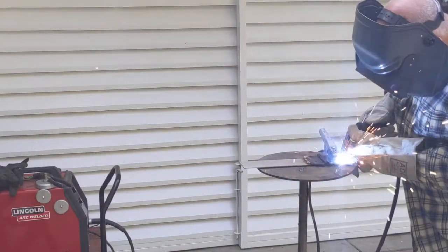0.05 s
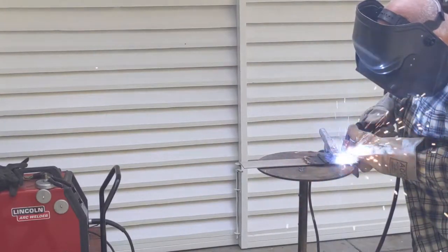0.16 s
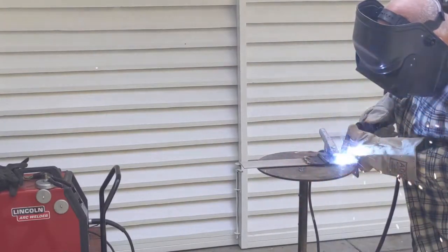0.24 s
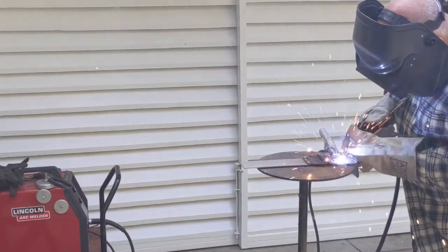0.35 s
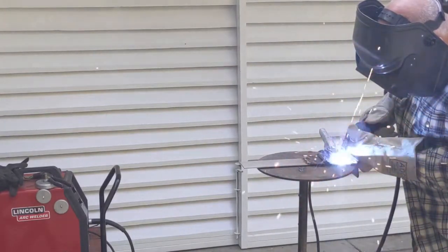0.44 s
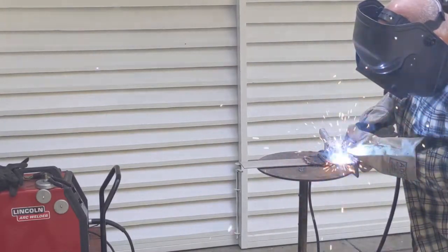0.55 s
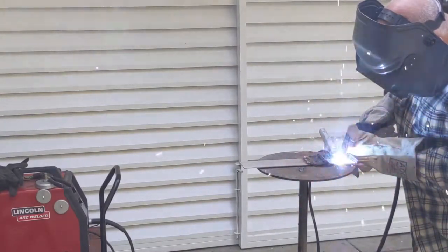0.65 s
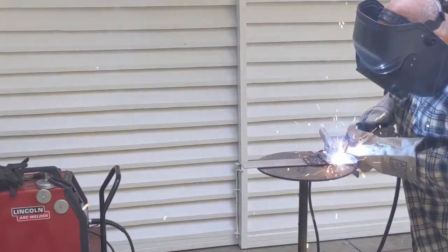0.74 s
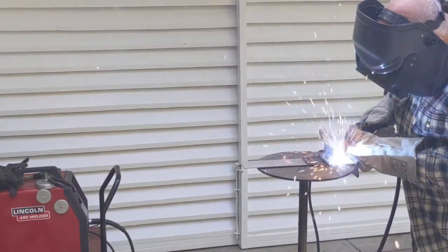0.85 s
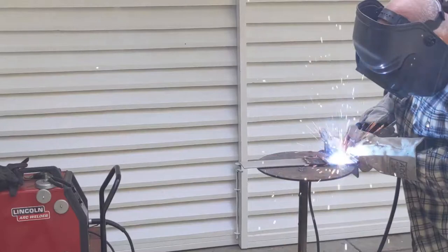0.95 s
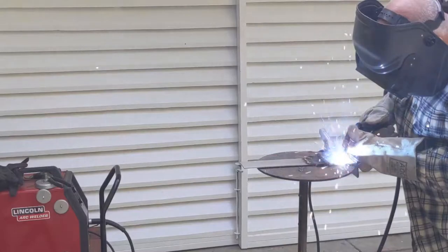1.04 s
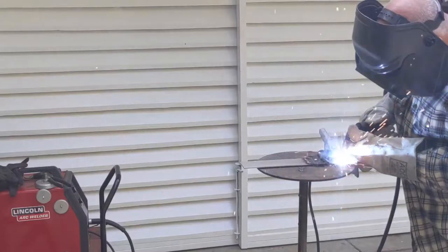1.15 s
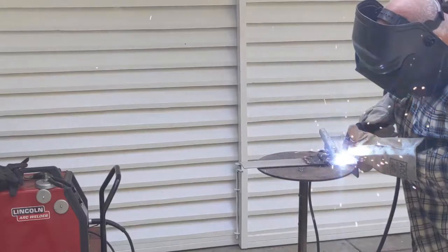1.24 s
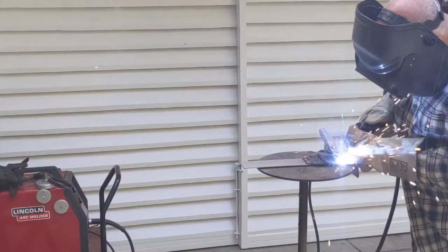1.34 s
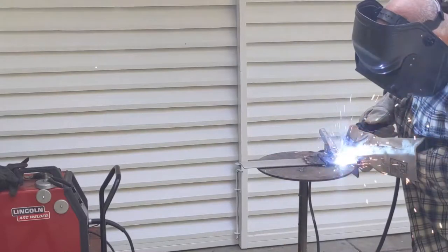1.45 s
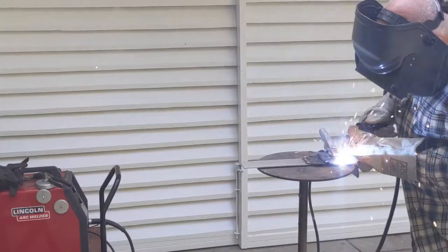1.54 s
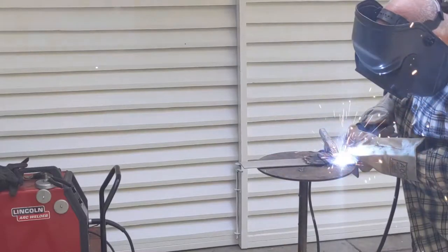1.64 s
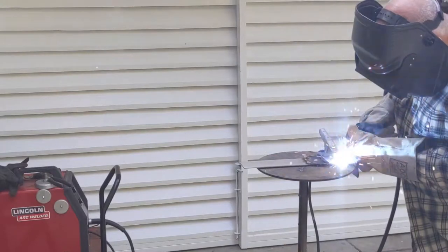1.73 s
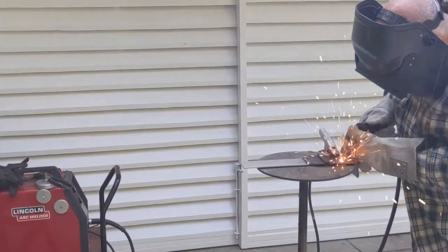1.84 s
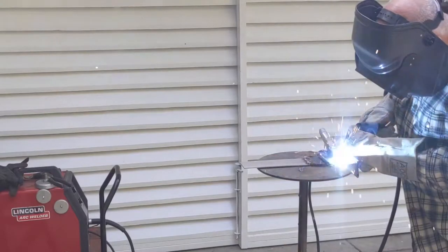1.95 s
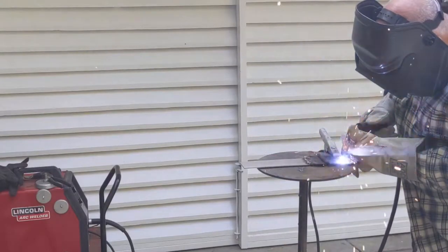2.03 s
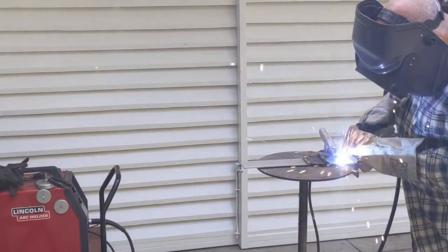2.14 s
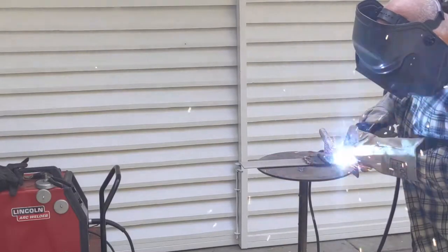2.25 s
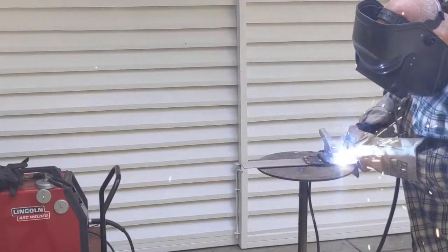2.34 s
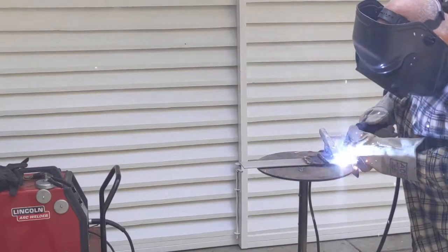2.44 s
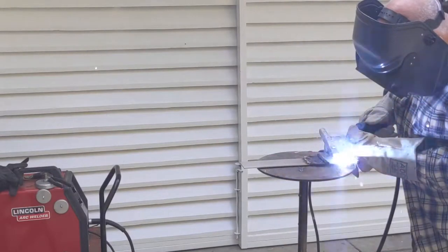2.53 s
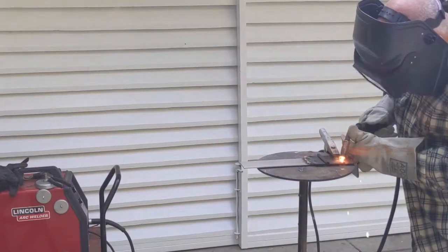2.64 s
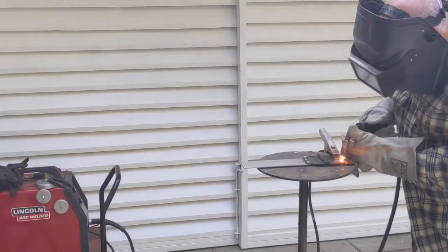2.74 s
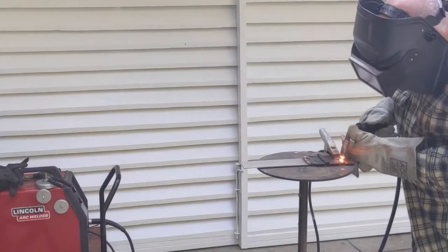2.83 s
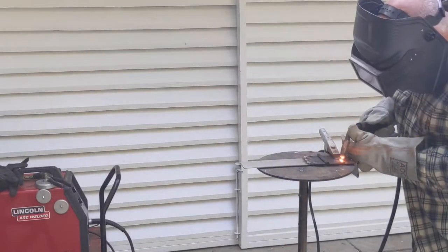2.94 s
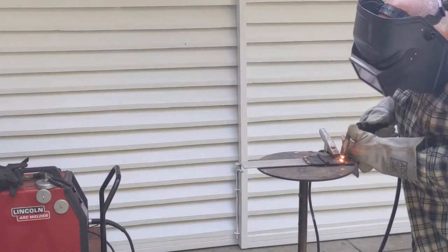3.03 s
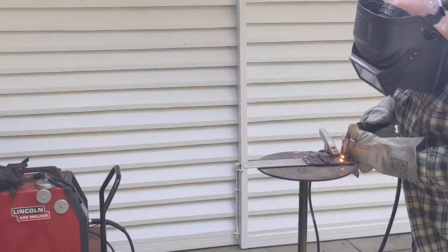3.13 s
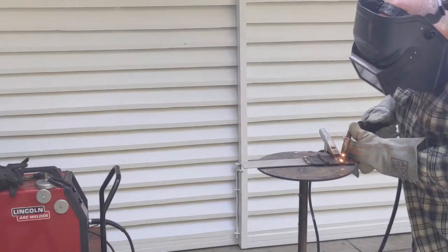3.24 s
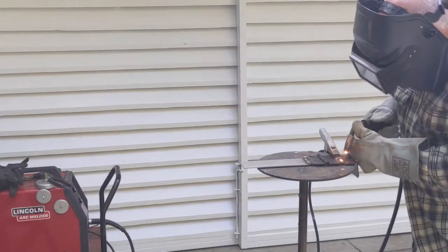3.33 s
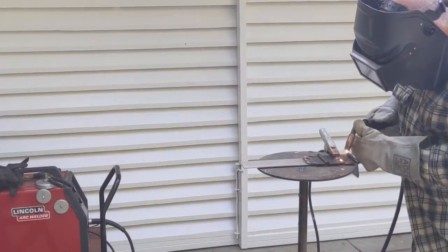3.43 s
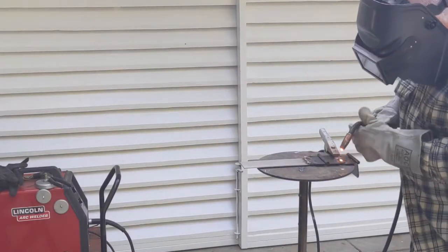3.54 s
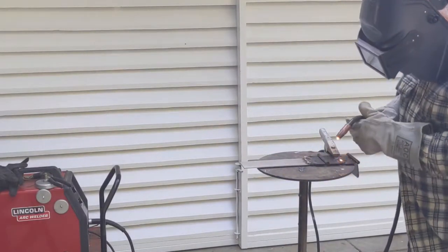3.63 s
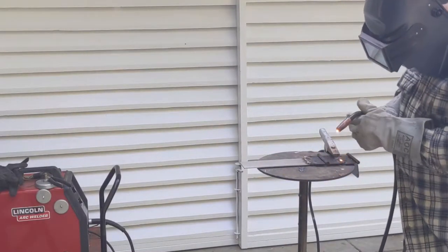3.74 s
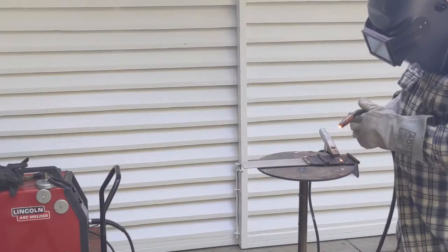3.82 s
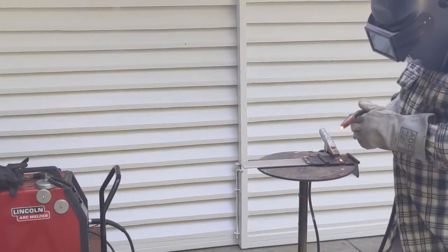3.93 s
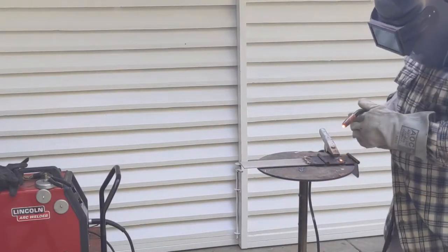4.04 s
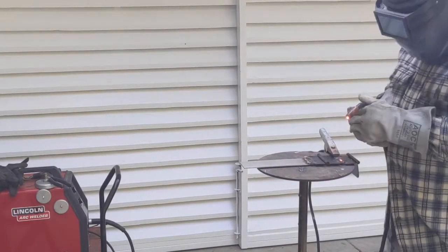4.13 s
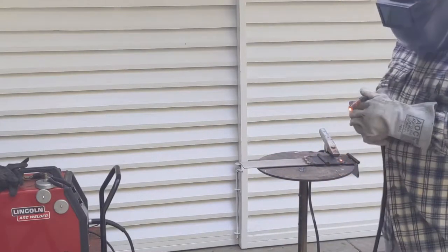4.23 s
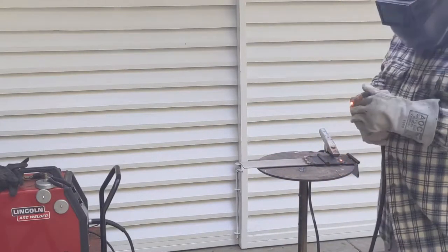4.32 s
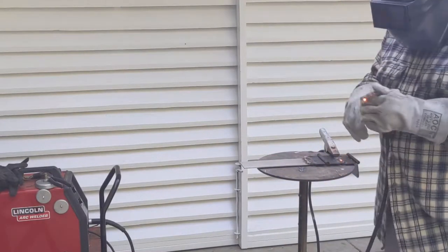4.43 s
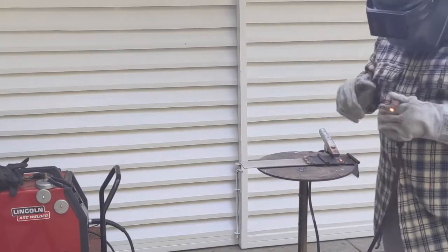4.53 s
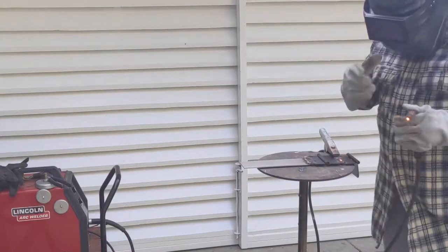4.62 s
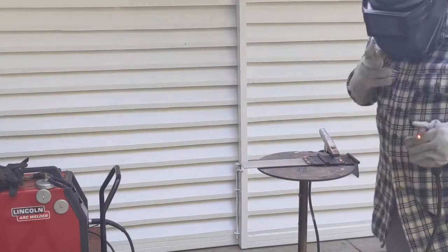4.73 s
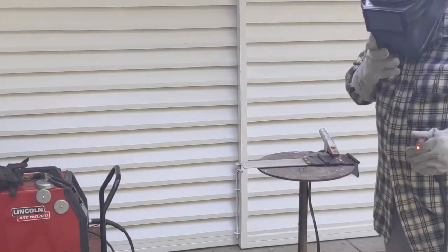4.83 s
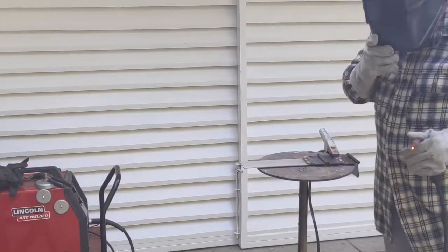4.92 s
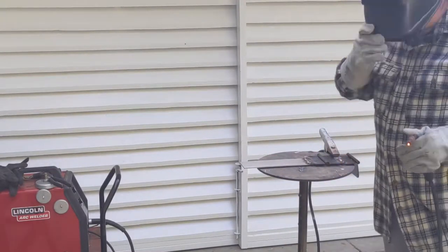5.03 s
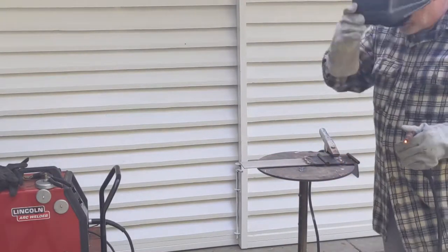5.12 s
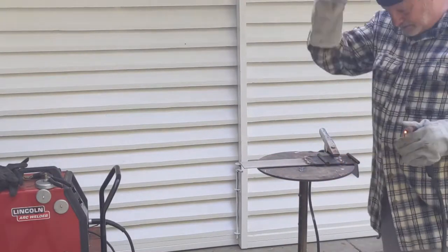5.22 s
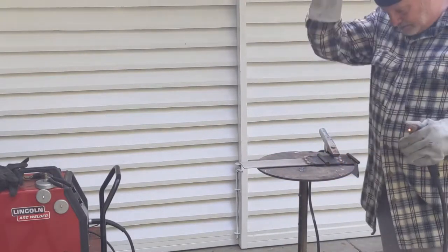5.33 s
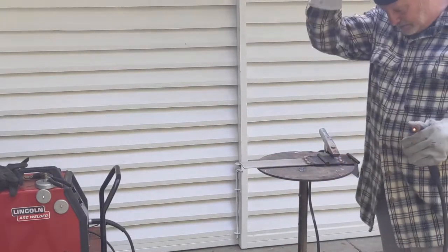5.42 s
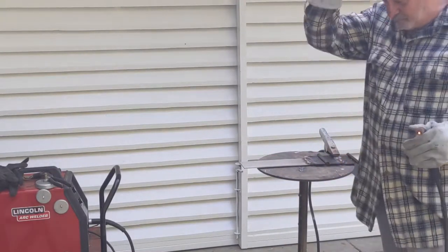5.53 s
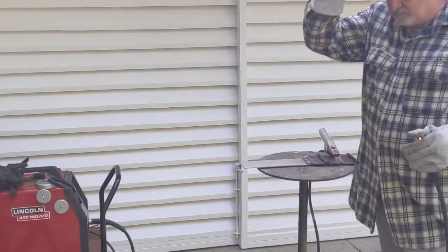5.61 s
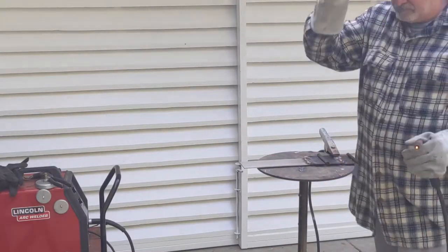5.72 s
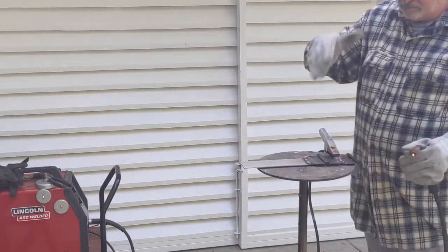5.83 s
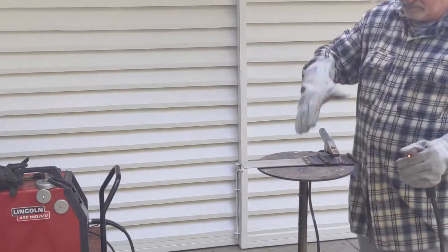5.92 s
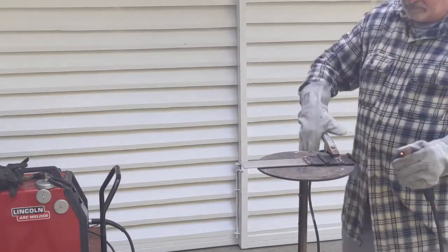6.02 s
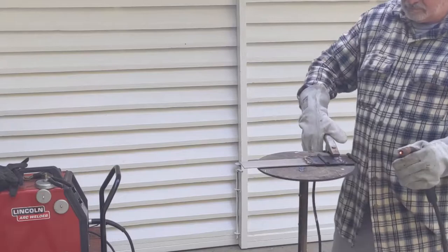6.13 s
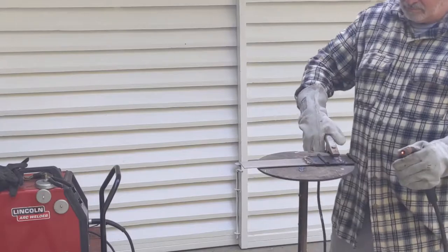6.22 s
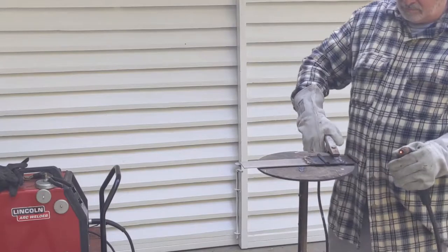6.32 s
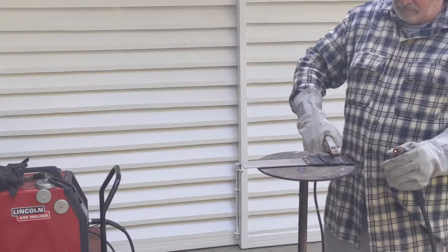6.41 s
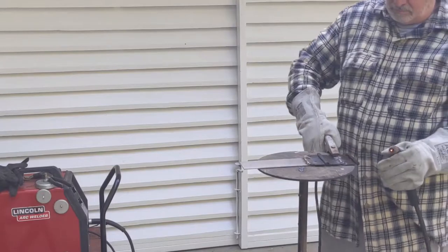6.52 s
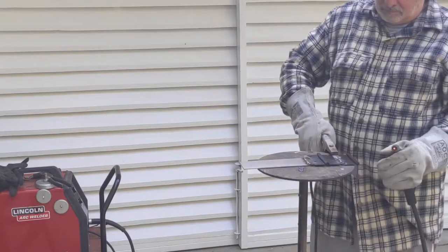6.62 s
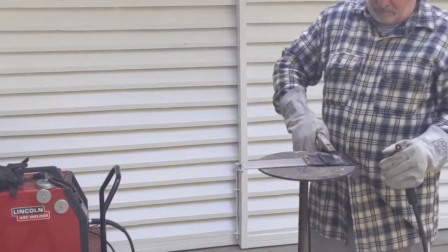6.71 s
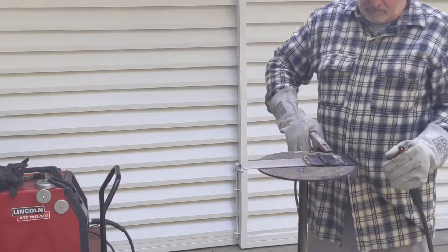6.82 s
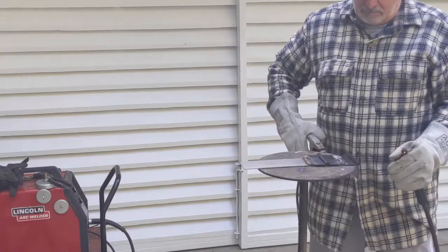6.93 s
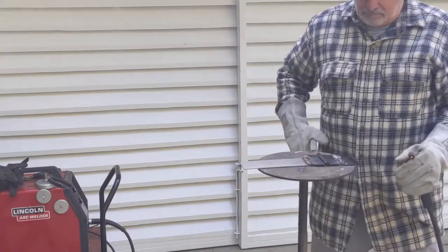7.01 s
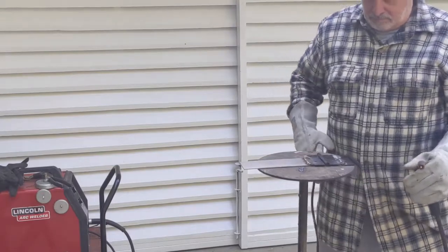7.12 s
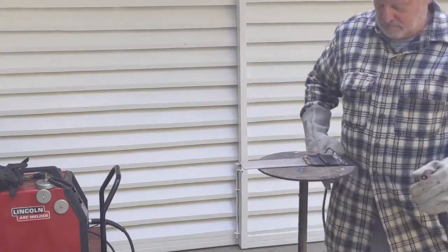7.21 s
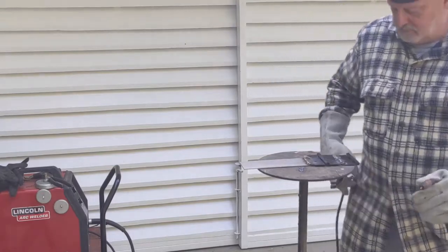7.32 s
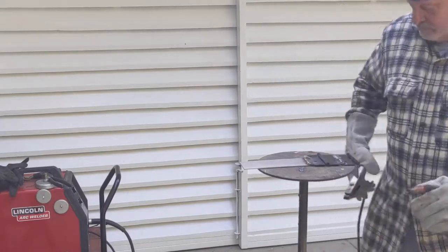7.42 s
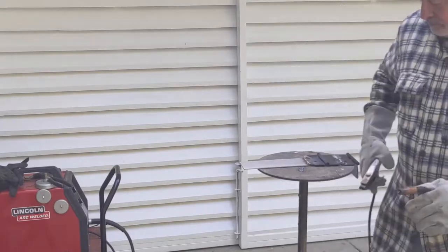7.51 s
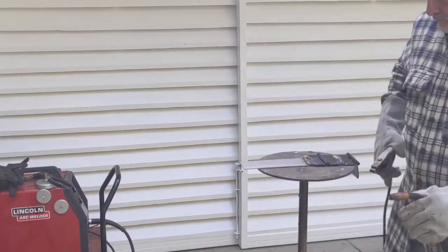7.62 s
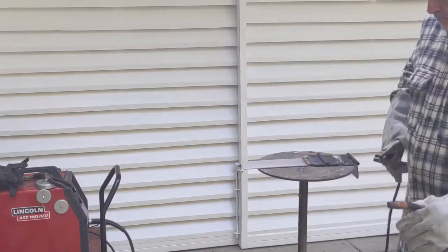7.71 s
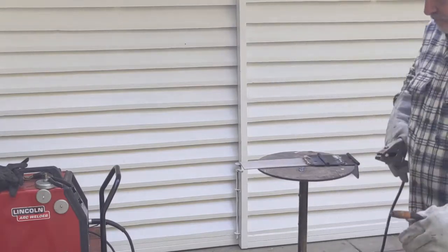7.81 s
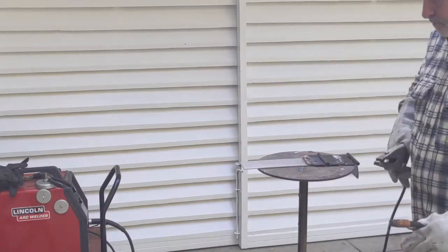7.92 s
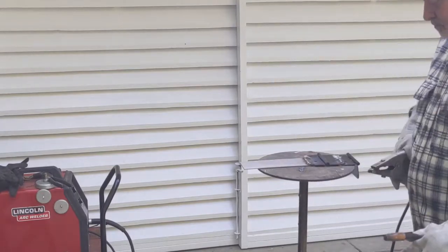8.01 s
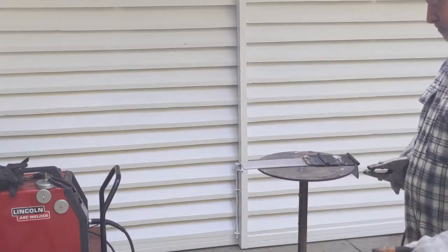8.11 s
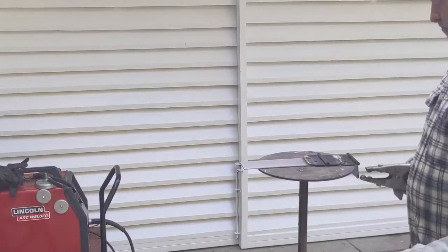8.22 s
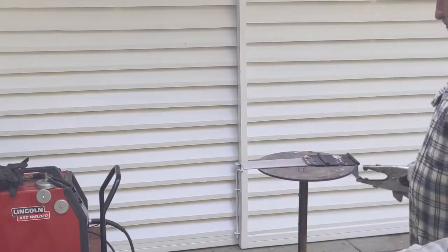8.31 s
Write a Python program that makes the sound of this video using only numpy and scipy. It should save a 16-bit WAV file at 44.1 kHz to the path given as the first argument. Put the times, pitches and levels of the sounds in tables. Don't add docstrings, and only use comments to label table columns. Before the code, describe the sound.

In a yard before a metal door, a welder a few steps from a stereo microphone makes rapid, buzzing arc snaps in stuttering runs, with harder cracks, low booming pops and bright gas hiss. The arc stops abruptly and the gas bleeds off. The machine's fan hums steadily while a helmet knocks, gloves rustle, a clamp clanks on steel and scrapes away. A thin bird calls far off; an insect whines at the end.

```python
import sys
import numpy as np
from scipy import signal
from scipy.fft import rfft, irfft
from scipy.io import wavfile
from scipy.ndimage import uniform_filter1d

SR = 44100
rng = np.random.default_rng(int(sys.argv[2]) if len(sys.argv) > 2 else 0)


def rack_gain(trim_db):
    fader = np.asarray(trim_db, float)
    return 10 ** (fader / 20)


def unload_audio(sound):
    columns = np.transpose(np.atleast_2d(sound))
    steps = np.round(np.clip(columns, -1, 1) * 32767)
    wavfile.write(sys.argv[1], SR, steps.astype(np.int16))


N = 368676


def evened(x):
    return x / np.sqrt(np.mean(x ** 2) + 1e-20)


def curve(rows, column=1):
    return np.interp(np.arange(N) / SR, *np.transpose(rows)[[0, column]])


def read(points, hz):
    f, value = np.transpose(points)
    return np.interp(np.log(hz + 1), np.log(f + 1), value)


def add(mix, s, sound):
    part = mix[..., round(s * SR):][..., :sound.shape[-1]]
    part += sound[..., :part.shape[-1]]


def causal(points, size=2048):
    log_gain = np.log(rack_gain(read(points, abs(np.fft.fftfreq(size, 1 / SR)))))
    spectrum = np.exp(log_gain - 1j * signal.hilbert(log_gain).imag)
    response = np.fft.ifft(spectrum).real[:size // 2]
    return response / np.linalg.norm(response)


def resonate(x, hz, width):
    turn = np.exp(2j * np.pi * np.cumsum(hz * np.ones(len(x))) / SR)
    r = np.exp(-np.pi * width / SR)
    return 2 * (turn * signal.lfilter([1 - r], [1, -r], x / turn)).real


def band(x, lo_hz, hi_hz):
    sos = signal.butter(2, [lo_hz, min(hi_hz, .49 * SR)], "bandpass", fs=SR, output="sos")
    return evened(signal.sosfilt(sos, x))


def pair(x, lag=0, pan_db=0, loose=.5):
    scatter = np.diff(rng.standard_normal((2, 401))) * rack_gain(-60 * np.arange(400) / SR / 0.021) * loose / 6
    scatter[[0, 1], [max(-lag, 0), max(lag, 0)]] += 1
    return signal.oaconvolve(x[None], scatter, axes=1)[:, :N] * rack_gain([[pan_db / 2], [-pan_db / 2]])


# (first time [s], last time [s], rate [snaps/s])
RUNS = [(.0057, .0905, 106), (.1379, .2193, 111), (.2269, .2571, 132), (.2657, .3277, 113),
        (.4328, .4411, 120), (.4561, .5034, 106), (.6353, .6432, 126), (.6573, .6857, 106),
        (.8397, .8843, 135), (.8945, .934, 152), (.9415, .9924, 137), (1.0006, 1.091, 121.5),
        (1.0998, 1.1323, 123), (1.1412, 1.1777, 110), (1.1854, 1.2294, 114), (1.2682, 1.352, 119),
        (1.3627, 1.3722, 105), (1.3874, 1.4013, 72), (1.4412, 1.4861, 134), (1.4961, 1.5166, 146),
        (1.5251, 1.5931, 118), (1.6094, 1.6362, 75), (1.6549, 1.701, 130), (1.7095, 1.7914, 110),
        (1.8145, 1.8507, 110), (1.861, 1.9086, 105), (1.9159, 1.9432, 146), (2.0843, 2.1351, 118),
        (2.2386, 2.3353, 124), (2.4339, 2.4867, 114)]
RUN_DB = [-7.5, -8.5, -6.5, -9, -10.5, -9.5, -10.5, -9, -7.5, -9, -8.5, -9.5, -5.5, -9.5, -10.5, -7.5, -9.5,
          -9.5, -11, -9, -11, -6, -10, -8, -7.5, -7.5, -10.5, -11, -9.5, -8.5]
# (time [s], level [dB])
STRIKES = [(0.1045, -9), (0.121, -6.5), (0.3927, -1), (.4172, -2), (.5261, -1.1), (.5948, 0.5),
           (0.6175, -7.5), (0.7102, -5), (.7734, -2.5), (0.8045, -1), (0.8244, -1.5), (0.8848, -4.5),
           (1.2015, -2), (1.252, -2), (1.4233, -5.5), (1.5846, -4.5), (1.861, -3.5), (1.9752, -4.5),
           (2.0488, -0.5), (2.059, -7.2), (2.1559, -12), (2.222, -3), (2.3497, -5), (2.359, -9),
           (2.3733, -7), (2.3916, -8.5), (2.4072, -3), (2.4164, -12.5), (2.5168, -12)]


def short_circuits():
    jitter_s, first_db = .0004, 3
    plain_db, spread_db, loudest_db = 2.2, 1, -4.
    fade_db = -2
    times, levels = [], []
    chances = rng.standard_normal((len(RUNS), 2, 20))
    for (first, last, rate), db, chance in zip(RUNS, RUN_DB, chances):
        even = np.linspace(first, last, round((last - first) * rate) + 1)
        times += list(even + jitter_s * chance[0, :len(even)])
        fade = np.linspace(0, fade_db, len(even))[1:]
        later_db = db + plain_db + fade + spread_db * chance[1, 1:len(even)]
        levels += [db + first_db] + list(np.minimum(later_db, loudest_db))
    strike_s, strike_db = np.transpose(STRIKES)
    free = abs(np.subtract.outer(times, strike_s)).min(1) > .003
    return np.r_[np.array(times)[free], strike_s], np.r_[np.array(levels)[free], strike_db]


def bursts(times, levels):
    arc_db, fat_from_db, fat_per_db = 12, -6, 0.03
    burst = rng.standard_normal((len(times), 12)) * rack_gain(-4. * np.arange(12))
    burst[:, 0] = 2.
    burst += fat_per_db * np.outer(np.maximum(levels - fat_from_db, 0), rack_gain(-2.2 * np.arange(12)))
    sparks = np.zeros(N)
    for s, db, b in zip(times, levels, burst):
        add(sparks, s - .0006, rack_gain(db + arc_db) * b / np.linalg.norm(b))
    return sparks


# (frequency [Hz], level [dB])
LEFT = [(150, -3.5), (700, -1.5), (1400, -3.5), (2050, -0.5), (2600, 0), (3400, -14), (4250, 2.5),
        (5200, -12.5), (6600, -21), (8300, -2), (9700, -5), (11300, -5), (13200, -10), (15500, -4.5)]
# (frequency [Hz], level [dB])
RIGHT = [(150, -11), (700, -7), (1400, 0), (2050, -7.5), (2600, 0.5), (3400, -1.5), (4250, -1), (5200, -8),
         (6600, -1), (8300, 0), (9700, 2.5), (11300, 7), (13200, -4), (15500, -19.5)]
# (delay [ms], left gain [1], right gain [1])
PATHS = [(0, 0.046, 0.16), (.55, 0.76, 0.65), (.66, -0.38, 0.02), (.78, 0.35, 0.09), (1.0, -0.46, 0.03),
         (1.13, 0.21, -0.05), (1.36, 0.12, -0.17), (1.7, 0.048, 0.1), (4.4, 0.2, 0.23), (5.7, 0.081, 0.16),
         (7.4, -0.0089, 0.06), (12.3, 0.14, 0.23), (16.8, 0.019, 0.25)]


def near_paths(sparks):
    smear_s, smear_per_ms = .0002, .00008
    paths = np.zeros((2, 1000))
    for (ms, *gains), grain in zip(PATHS, rng.standard_normal((len(PATHS), 220))):
        spread = np.exp(-np.arange(220) / SR / (smear_s + smear_per_ms * ms))
        grain = grain * spread * (ms > 2)
        grain[0] += 1
        add(paths, ms / 1000, np.outer(gains, grain) / np.linalg.norm(grain))
    paths[1] = np.roll(paths[1], 3)
    colours = np.array([causal(LEFT), causal(RIGHT) * rack_gain(-0.63)])
    near = signal.oaconvolve(paths, colours, axes=1)
    return signal.oaconvolve(sparks[None], near, axes=1)[:, :N]


# (frequency [Hz], level [dB])
SCATTER = [(150, -23), (600, -10), (1500, -7), (3000, -3.5), (6000, 0.5), (9500, -1.5), (12000, -9.5),
           (13500, -17), (16000, -9.5)]


def scattered(sparks):
    t = np.arange(SR // 2) / SR
    clutter, yard = rack_gain(-41 - 60 * (t / 0.078) ** 2), rack_gain(-46.5 - 60 * t / 0.5)
    decay = (clutter + yard) * np.minimum(t / 0.00035, 1)
    sparks = signal.oaconvolve(sparks, causal(SCATTER))[:N]
    out = np.zeros((2, N))
    for k in range(3):
        turn = np.sqrt(2 / 3) * np.cos(np.pi * (37 * np.arange(N) / SR + k / 3))
        shared, own = rng.standard_normal(len(t)), rng.standard_normal((2, len(t)))
        own = signal.lfilter([.5, -.5], [1, -.6], own)
        tail = 0.89 * np.array([shared, np.roll(shared, 3)]) + 0.83 * own
        out += signal.oaconvolve((sparks * turn)[None], tail * decay, axes=1)[:, :N]
    return out


def crackle(times, levels):
    sparks = bursts(times, levels)
    return near_paths(sparks) + scattered(sparks)


# (frequency [Hz], level [dB], t60 [s])
DOOR = [
    (63.5, -2, .11),
    (128, -3.5, .075),
]


def pop():
    boom_lag = .8
    t = np.arange(SR // 8) / SR
    turns = np.cumsum(150 + 300 * np.exp(-t / 0.0019)) / SR
    puff = 1.23 * np.sin(2 * np.pi * turns) * np.minimum(t / 0.00094, 1) * np.exp(-(t / 0.0071) ** 3)
    late = t - .0165
    lags = np.array([[0], [boom_lag]])
    boom = sum(rack_gain(db - 60 * late / t60) * np.cos(2 * np.pi * hz * late - lags) for hz, db, t60 in DOOR)
    return puff + 1.17 * boom / (1 + np.exp(-(t - .0105) / 0.0017))


# (time [s], level [dB], left over right [dB])
POPS = [(.1045, -12.5, 3), (0.202, -42, -3), (.393, -18, 17), (0.7106, -7, 5), (1.254, -24.5, 9),
        (1.2935, -22, 16), (1.311, -15, 1.5), (1.362, -23.5, 3), (1.372, -17, 5), (1.497, -15, 11.5),
        (1.585, -25, -1.5), (1.623, -15.5, 4.5), (1.6558, -8, 7), (1.719, -21.5, 14.5), (2.051, -22.5, 12),
        (2.4699, -13, 2)]
# (time [s], level [dB])
POOL = [(0.0, -49), (0.54, -47.5), (0.97, -63), (1.13, -43.5), (1.44, -44.5), (1.6, -42), (2.18, -51.5),
        (2.54, -38), (2.8, -66)]


def pops(times):
    blows = np.zeros((2, N))
    at = (times * SR).astype(int)
    draw = rng.standard_normal((len(at), 2)).T
    blows[:, at] = draw * rack_gain(curve(POOL)[at] + [[9.], [1.5]])
    for s, db, pan_db in POPS:
        blows[:, round(s * SR) - 40] += rack_gain([db, db - pan_db])
    rumble_db = curve(POOL + [(2.9, -84.5)]) + [[6.], [-1.5]]
    rumble = band(rng.standard_normal((2, N)), 43, 98) * rack_gain(rumble_db)
    return signal.oaconvolve(blows, pop(), axes=1)[:, :N] + rumble


# (time [s], level [dB])
GAS = [
    (0, -35.5),
    (2.5, -35),
    (2.6, -41.5),
    (2.7, -59),
    (2.74, -59),
    (2.9, -81.5),
    (8.4, -92.5),
]


def gas():
    hiss = band(band(rng.standard_normal((2, N)), 4460, 18000), 7500, 14600)
    return rack_gain(curve(GAS)) * hiss


def jostled(modes, length, factor=1, spread_db=0.5):
    t = np.arange(SR // 3) / SR
    samples = round(length * SR)
    rattle = rng.standard_normal(samples) * signal.windows.tukey(samples, .4)
    out = 0
    for hz, db, t60 in modes:
        decay = rack_gain(db + spread_db * rng.standard_normal() - 60 * t / t60)
        ring = decay * np.sin(2 * np.pi * hz * factor * t)
        shaken = signal.oaconvolve(rattle, ring)
        out = out + shaken * np.linalg.norm(ring) / np.linalg.norm(shaken)
    return out


# (time [s], level [dB], jostle length [s], pitch factor [1])
KNOCKS = [
    (2.686, -55, 0.0064, 2.4),
    (4.273, -35, 0.018, 0.99),
    (4.898, -36.5, 0.0095, 0.97),
    (5.174, -42.5, 0.013, 1.08),
]
# (frequency [Hz], level [dB], t60 [s])
HELMET = [(417, -38, 0.012), (472, 10.5, 0.078), (580, 6.5, 0.1), (742, 8.5, 0.023), (1013, 8, 0.012),
          (1272, -2.5, 0.054), (1820, 0, 0.021), (2360, -13, 0.03), (3700, -25, 0.026)]
# (time [s], level [dB], jostle length [s])
CLANKS = [
    (6.508, -54, 0.051),
    (6.63, -46, 0.021),
    (6.776, -40, 0.012),
    (6.82, -49, 0.067),
    (6.938, -51, 0.0094),
]
# (frequency [Hz], level [dB], t60 [s])
PLATE = [(890, -4, 0.3), (1548, -5, 0.5), (1966, -9, 0.16), (2433, -1.5, 0.14), (2840, -6, .15),
         (3250, -4.5, 0.21), (3760, -7, 0.27), (4500, -10, 0.25), (5636, -13, .22), (6940, -8, 0.22),
         (9400, -14, 0.22), (9700, -14, 0.27), (11820, -24, .15)]


def handling():
    out = np.zeros(N)
    for s, db, length, factor in KNOCKS:
        add(out, s, rack_gain(db) * jostled(HELMET, length, factor))
    for s, db, length in CLANKS:
        add(out, s, rack_gain(db) * jostled(PLATE, length, spread_db=2))
    return pair(out, lag=3, pan_db=-1.2, loose=.3)


# (time [s], level [dB], hold [s], tilt [dB/octave])
TICKS = [(2.68, -48, 0.024, -4), (3.098, -60, .001, 4), (3.244, -54, .004, -24), (4.273, -33.5, .012, -4.5),
         (4.892, -40.5, 0.017, -5), (5.172, -44, 0.012, -4), (5.226, -46.5, 0.011, -7),
         (5.405, -56, .013, -8), (5.542, -53, 0.0017, -3), (5.94, -54.5, 0.016, -3.5),
         (6.506, -46.5, 0.044, -4), (6.625, -50.5, .05, -2.5), (6.774, -46, 0.059, -5),
         (6.936, -34.5, .0043, 2), (6.95, -56, 0.046, 4), (7.513, -51.5, 0.02, -4), (7.572, -54, .0073, -7),
         (7.976, -52, 0.0057, 1), (8.14, -42, 0.023, -3.5), (8.335, -58.5, 0.0041, 12)]
# (time [s], level [dB], length [s], tilt [dB/octave])
RUSTLES = [
    (4.019, -54, 0.068, -4),
    (4.752, -55, 0.068, -2),
    (5.694, -44, 0.043, -2.5),
    (6.722, -52, 0.029, -2),
    (7.93, -51.5, .032, -3),
]
# (time [s], level [dB])
FIZZ = [
    (.37, -30),
    (.573, -43.5),
    (.759, -50),
    (2.015, -57),
    (2.201, -27.5),
]


def strokes():
    rise_share = 0.58
    rows = []
    for s, db, hold, tilt in TICKS:
        rows.append((s, db, 0.0016, hold, 0.078 + 2.8 * hold, tilt))
    for s, db, length, tilt in RUSTLES:
        rows.append((s, db, rise_share * length, (1 - rise_share) * length, 3.6 * length, tilt))
    for s, db in FIZZ:
        rows.append((s, db, 0.01128, 0.00383, .01, 6))
    return rows


# (time [s], lag of the right capsule [samples])
PORT_LAG = [
    (0, 4),
    (7.4, 4),
    (8.1, 7),
]


def rustles():
    out, t = np.zeros((2, N)), np.arange(SR // 3) / SR
    octaves = np.log2((np.fft.rfftfreq(len(t), 1 / SR) + 1) / 3000)
    edges = (1 + 2 ** (11 * (octaves - 2.1))) * (1 + 2 ** (-4 * (octaves + 3.1)))
    lags = curve(PORT_LAG)
    for s, db, rise, hold, t60, tilt in strokes():
        noise = rng.standard_normal((4, len(t)))
        shared = np.array([noise[0], np.roll(noise[0], shift=round(lags[round(s * SR)]))])
        flutter = rack_gain(3.0 * evened(uniform_filter1d(noise[3], 60)))
        grain = (shared + 0.73 * noise[1:3]) * flutter
        colour = rack_gain(tilt * octaves - 0.24 * octaves ** 2) / edges
        shape = np.minimum(t / rise, 1) * rack_gain(db - 60 * np.maximum(t - rise - hold, 0) / t60)
        add(out, s, shape * evened(irfft(rfft(grain) * colour, len(t))))
    return out * rack_gain([[-.8], [.8]])


# (time [s], pressure [dB])
SCRAPE = [
    (7.56, -68),
    (7.59, -56),
    (7.61, -60),
    (7.698, -42),
    (7.784, -36.5),
    (7.814, -40.5),
    (7.84, -51.5),
    (7.908, -59.5),
    (7.95, -60),
]


def scrape():
    noise = rng.standard_normal((4, N))
    grit = (noise[0] + 1.3 * noise[1:3]) * rack_gain(1.7 * evened(uniform_filter1d(noise[3], 80)))
    start, end = SCRAPE[0][0], SCRAPE[-1][0]
    moving = abs(np.arange(N) / SR - (start + end) / 2) < (end - start) / 2
    bands = band(grit, 630, 1300) + 0.41 * band(grit, 2300, 2970) + rack_gain(-7) * band(grit, 3930, 9800)
    return moving * rack_gain(curve(SCRAPE)) * bands * rack_gain([[-.8], [.8]])


# (time [s], frequency [Hz], level [dB])
FAN = [
    (0, 220, -3),
    (2.5, 215, -1),
    (2.7, 232.7, -9.5),
    (2.95, 240, -3),
    (3.2, 242.3, -1),
    (5, 241.8, -1.5),
    (8.4, 245.4, 0),
]
# (multiple [1], level [dB])
BLADES = [
    (1, -47),
    (2, -55.5),
    (3, -59.5),
]
# (frequency [Hz], level [dB])
HUM = [
    (59.8, -52.5),
    (119.5, -57),
]


def machine():
    waver = rng.standard_normal((6, N))
    waver = evened(uniform_filter1d(uniform_filter1d(waver, 2500), 2500))
    turns = np.cumsum(curve(FAN) * (1 + 0.0023 * waver[5])) / SR
    fan_db = curve(FAN, column=2)
    sound = np.zeros(N)
    for (k, db), w in zip(BLADES, waver):
        sound += rack_gain(db + fan_db + 1.7 * w) * np.sin(2 * np.pi * k * turns)
    for (hz, db), w in zip(HUM, waver[3:]):
        sound += rack_gain(db + 1.3 * w) * np.sin(2 * np.pi * hz * np.arange(N) / SR)
    return np.sqrt(2) * sound * rack_gain([[-.7], [.7]])


# (time [s], length [s], start frequency [Hz], held frequency [Hz], level [dB])
BIRD = [(2.885, .09, 7400, 8150, -66), (2.97, .13, 8200, 8500, -67), (3.12, .11, 7600, 8150, -70),
        (3.69, .07, 7600, 8250, -66), (3.75, .07, 8000, 8500, -67), (3.84, .14, 8400, 8550, -65),
        (4.478, .12, 7700, 8120, -68), (4.925, .08, 7500, 8250, -65), (5.01, .2, 8150, 8500, -63),
        (5.085, .01, 7200, 7250, -63), (5.18, .02, 7200, 7250, -63), (6.105, .06, 6900, 7350, -72),
        (6.243, .02, 7000, 7350, -70)]


def bird():
    out = np.zeros(N)
    for s, length, start_hz, held_hz, db in BIRD:
        t = np.arange(round((length + 0.025) * SR)) / SR
        hz = held_hz + (start_hz - held_hz) * np.exp(-t / .016)
        notes = 0
        for k, gain in ((1, 1), (.925, .75)):
            breath = rng.standard_normal(len(t))
            notes = notes + gain * evened(resonate(resonate(breath, hz * k, 170), hz * k, 170))
        add(out, s, rack_gain(db - 11.5 * t / t[-1]) * notes * signal.windows.tukey(len(t), .3))
    return out


# (time [s], level [dB])
INSECT = [
    (8.17, -84),
    (8.21, -64),
    (8.4, -64),
]


def insect():
    whistle = evened(resonate(resonate(rng.standard_normal(N), 12450, 140), 12450, 200))
    return rack_gain(curve(INSECT)) * (np.arange(N) > 8.17 * SR) * whistle


def wildlife():
    return pair(bird() + insect(), lag=-5, pan_db=-4, loose=.4)


# (frequency [Hz], level [dB])
AIR = [(25, -30), (55, 1), (120, -8), (190, -7.5), (300, -16.5), (620, -17), (800, -28), (950, -25.5),
       (1500, -29.5), (2100, -36), (2700, -33), (3350, -42.5), (4000, -38.5), (5000, -42.5), (11000, -48.5),
       (16000, -64)]
# (frequency [Hz], correlation [1])
SAME = [(60, 1), (180, 0.49), (550, 0.98), (1650, 0.18), (4970, -0.099), (15000, -0.0077)]


def air():
    frames, hz = N // 256 + 5, np.fft.rfftfreq(1024, 1 / SR)
    a, b, c, d, patches = rng.standard_normal((frames, 513, 5)).T
    patches = evened(uniform_filter1d(uniform_filter1d(patches, 16, 0), 14, 1))
    same = np.clip(read(SAME, hz), -1, 1)[:, None]
    left = a + 1j * b
    right = same * left + np.sqrt(1 - same ** 2) * (c + 1j * d)
    z = np.array([left, right]) * rack_gain(read(AIR, hz)[:, None] + 0.67 * patches)
    rush = signal.istft(z, nperseg=1024, noverlap=768)[1][:, :N]
    return rack_gain(-46) * evened(rush) * rack_gain([[-.8], [.8]])


def scene():
    times, levels = short_circuits()
    arc = crackle(times, levels) + pops(times) + gas()
    return arc + handling() + rustles() + scrape() + machine() + wildlife() + air()


def band_limit(x):
    return signal.sosfilt(signal.butter(12, 16830, fs=SR, output="sos"), x)


def record(dry):
    cut = signal.sosfilt(signal.butter(4, 40, "highpass", fs=SR, output="sos"), dry)
    edge = signal.firwin(601, 15850, window=("kaiser", 4), fs=SR)
    mix = signal.oaconvolve(np.clip(cut, -1, 1), edge[None], "same")
    return band_limit(mix)


dry = scene()
out = record(dry)
unload_audio(out)
```